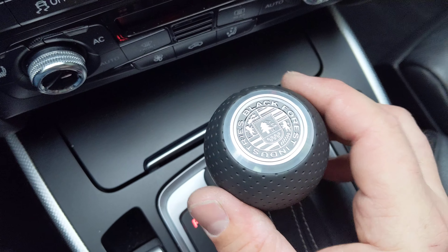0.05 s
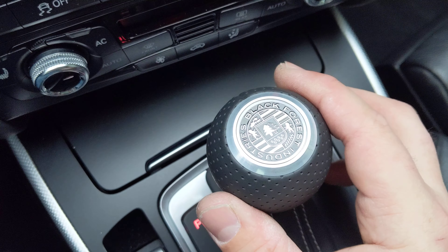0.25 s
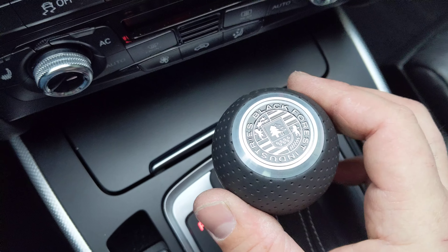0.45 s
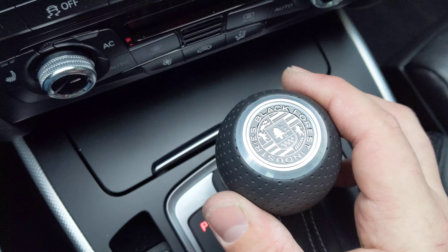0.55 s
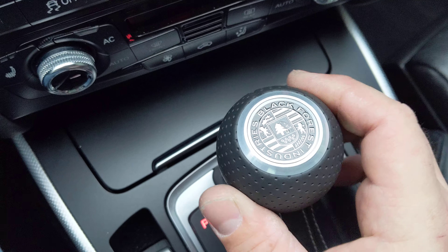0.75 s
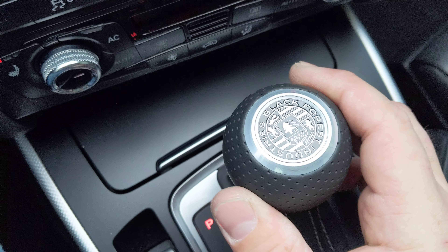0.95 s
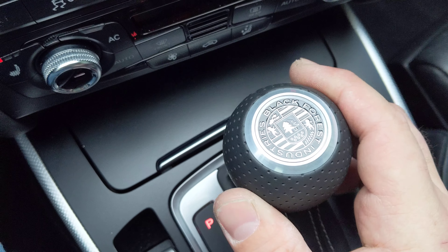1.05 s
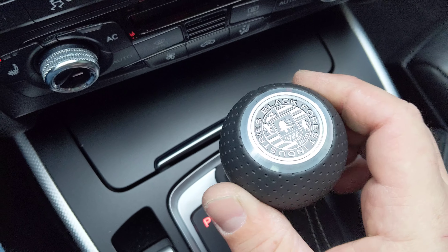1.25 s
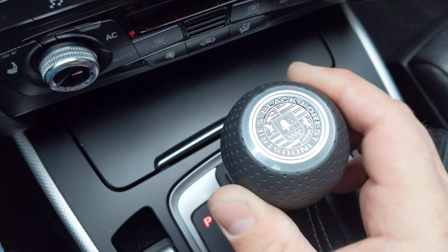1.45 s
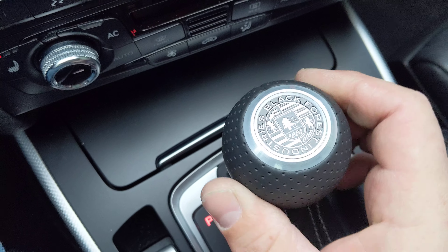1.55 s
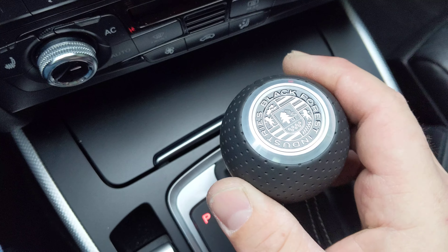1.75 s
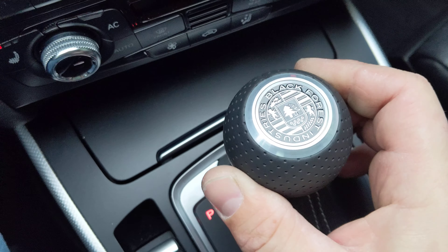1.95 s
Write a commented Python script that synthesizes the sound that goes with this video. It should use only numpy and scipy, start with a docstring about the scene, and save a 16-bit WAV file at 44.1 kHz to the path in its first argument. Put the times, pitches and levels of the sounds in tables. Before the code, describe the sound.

A loose gear knob rattles under a rocking hand, close up in a dry, padded car cabin. Small contacts begin at once, with duller double and triple chatter near 0.5, 0.7, 1.1, 1.45 and 1.8 seconds. Firmer knocks with bright ticks land near 0.9, 1.3, 1.65 and 2.0. Beneath run a steady low idling throb, soft rumble, faint hiss and a barely audible, very high whine.

```python
"""A loose gear lever knob is rocked to and fro by hand in a car with the engine idling.
One way it hits its stop with a knock and a bright tick; on the way back it chatters softly.
Each contact is a set of decaying rings plus bursts of coloured noise, answered briefly by the padded cabin.
Beneath lie the engine's throb (harmonics of the firing rate), rumble and hush (coloured noise)
and a thin electronic whine (a sine)."""
import sys
import numpy as np
from scipy import signal
from scipy.fft import rfft, irfft
from scipy.io import wavfile
from scipy.ndimage import uniform_filter1d

SR = 44100
rng = np.random.default_rng(int(sys.argv[2]) if len(sys.argv) > 2 else 0)


def digitize_waveform(pressure):
    """Quantize a signal to 16-bit integers and store it at the path in sys.argv[1].

    Rows of a 2-D input are taken as channels; values are limited to [-1, 1].
    """
    field = np.atleast_2d(pressure).T
    bounded = np.clip(field, -1, 1)
    quanta = np.round(bounded * 32767).astype(np.int16)
    wavfile.write(sys.argv[1], SR, quanta)


N = 88905  # length in samples

# Colour of the cabin hush. Each row: frequency in Hz, relative level in dB per Hz.
HUSH_COLOUR = [(100, -28), (160, -8.5), (260, -4), (380, -10.5), (500, -12.5), (760, -23.5), (1010, -17.5),
               (1200, -25.5), (1800, -33.5), (4600, -32.5), (7500, -34), (9500, -37), (10600, -41.5),
               (12000, -37), (15000, -54)]
# Colour of the body rumble. Each row: frequency in Hz, relative level in dB per Hz.
RUMBLE_COLOUR = [(8, -13.5), (20, -6.5), (45, 5), (80, -20.5), (125, -5), (170, -26), (300, -50.5)]
# Likeness of the two ears in steady noise. Each row: frequency in Hz, coherence from 0 to 1.
EAR_COHERENCE = [(60, .99), (130, .95), (250, .87), (1000, .65), (2500, .2), (12000, .1)]
# Stereo tilt of steady noise. Each row: frequency in Hz, left minus right in dB.
NOISE_LEFT_DB = [(60, 0), (130, 1), (300, 3), (1000, 4), (4000, -0.5), (13000, -1.5)]
# Whine, shifting between the ears. Each row: time in seconds, left level in dB, right level in dB,
# phase lead of the left in radians.
WHINE_PATH = [(0, -75, -89, 2.5), (.6, -73.5, -101, -1), (.9, -73.5, -97, -13), (1.148, -81, -96, -7),
              (1.598, -78, -88, -3), (1.999, -83, -80, -2.2)]
# Engine harmonics. Each row: multiple of the firing rate, level in dB.
ENGINE_ORDERS = [(1, -41), (2, -55), (3, -60), (4, -68.5), (5, -65.5), (6, -64.5)]
# Echoes from console and windscreen. Each row: delay in seconds, gain as a plain factor.
CABIN_ECHOES = [(.0033, .3), (.0052, 0.58), (.0088, 0.086)]
# Colour of the cabin's tail. Each row: frequency in Hz, level in dB.
CABIN_COLOUR = [(250, -16), (500, -12), (1000, -6), (4000, 0), (9000, 0)]
# Decay of the cabin's tail. Each row: frequency in Hz, time to fall 60 dB in seconds.
CABIN_DECAY = [(200, .1), (500, .07), (1400, .07), (4000, .085), (10000, .07)]
# Contacts of the knob. Each row: time in seconds, relative levels of thud, knock, clack and tick in dB,
# side of its play ("near" or "far").
CONTACTS = [(0.0246, -56.5, -62.5, -63.5, -74, "near"), (0.228, -57, -69, -76, -87, "far"),
            (.2450, -49, -61, -75, -83, "far"), (.4200, -83, -74, -74, -77, "near"),
            (0.4989, -45.5, -52.5, -58, -71, "far"), (0.659, -58, -66, -73, -93, "far"),
            (0.6879, -53, -60.5, -59.5, -72.5, "far"), (0.717, -86, -67, -71, -82, "far"),
            (.8840, -64, -71, -68, -86, "near"), (0.9108, -43.5, -56, -59, -60.5, "near"),
            (1.0887, -49.5, -60, -61.5, -79, "far"), (1.1117, -56.5, -62.5, -63.5, -74, "far"),
            (1.2857, -45.5, -50.5, -57.5, -55, "near"), (1.4352, -53, -52.5, -66.5, -77, "far"),
            (1.4677, -51.5, -60.5, -66, -66.5, "far"), (1.4904, -56.5, -61.5, -66, -71.5, "far"),
            (1.6402, -41, -52.5, -55.5, -57.5, "near"), (1.8211, -51, -54, -62.5, -82, "far"),
            (1.829, -56, -66, -66, -82, "far"), (1.8480, -66, -62, -72, -77.5, "far"),
            (2.0115, -46, -54.5, -49.5, -52.5, "near")]
# Where thud, knock, clack and tick are centred. Each entry: frequency in Hz.
BLOW_HZ = [400, 1100, 4200, 7600]
# Rings of lever and knob. Each row: nominal frequency in Hz, time to fall 60 dB in seconds,
# relative level struck on the near side in dB, relative level struck on the far side in dB.
RING_MODES = [(239.7, 0.11, -5.5, -18), (281.3, 0.061, -5, 2.5), (370.5, 0.024, -17, -3),
              (452.5, 0.056, -1, -9), (483.8, 0.063, -4, -9.5), (689, 0.02, -1, -5),
              (938.7, 0.013, 1.5, -0.5), (1239, 0.0082, 0, -5.5), (2416, 0.0072, -10.5, -9.5),
              (3756, 0.0023, -11, -6), (5590, 0.0089, -1, -3.5), (7490, 0.0037, -1, -10),
              (9420, 0.0022, -2, -6.5), (10940, 0.001, -8.5, -24)]
# Stereo tilt of the knob. Each row: frequency in Hz, right minus left in dB.
KNOB_RIGHT_DB = [(300, 0), (1000, -7.5), (4000, -2), (8000, -0.5), (12000, -3)]

HUSH_DB, RUMBLE_DB = -61, -52.5
WHINE_HZ = 15625
FIRING_HZ, FIRST_FIRING_S = 23.22, 0.0028
IDLE_WANDER = 0.001  # rms unevenness, as a fraction of the firing rate
THROB_LEFT_DB = 0.7
EVEN_HZ = 150  # the cabin tail's spectrum is evened over bands this wide
TAIL_RISE_S = 0.0012
KNOB_DB = -13
BEFORE_S = 0.02  # room for the scuff ahead of each contact
RIGHT_LAG_S = 0.0001  # the right ear hears the contact later
METAL_HZ = 2000  # modes above this ring when the metal seat is reached
NEAR_LEAD_S, FAR_LEAD_S = 0.0028, 0.001  # the lever is pressed this long before the seat clicks
THUD_LAG_CYCLES, THUD_TOP_HZ = 0.6, 600  # the low ring reaches the console late
SEAT_RISE_S, RISE_CYCLES = 0.0004, 1  # the two parts of each ring's rise time
DETUNE, SCATTER_DB = 0.015, 0.4  # random spread of pitch (fraction) and level of each ring
CRACK_DB, CRACK_T60_S, CRACK_TOP_HZ = 1, 0.0085, 10300
SCUFF_DB, SCUFF_S, SCUFF_TOP_HZ = 3.5, 0.003, 3830
EDGE_HZ = 16000


def amp(db):
    """Decibels to gain."""
    return 10 ** (np.asarray(db) / 20)


def evened(x):
    """Scales to rms 1."""
    return x / np.sqrt(np.mean(x ** 2) + 1e-20)


def read(points, hz):
    """Reads a table on a log-frequency axis."""
    f, value = np.transpose(points)
    return np.interp(np.log(hz + 1), np.log(f + 1), value)


def decay(t, t60):
    """Exponential decay that falls 60 dB in t60 seconds."""
    return np.exp(-np.log(1000) * t / t60)


def add(mix, s, sound):
    """Mixes a stereo sound in at a time in seconds."""
    part = mix[:, max(round(s * SR), 0):][:, :sound.shape[1]]
    part += sound[:, :part.shape[1]]


def noise(colour):
    """Steady stereo noise of a given colour at rms 1: random phases, near mono in the bass."""
    hz = np.fft.rfftfreq(N, 1 / SR)
    shared, other = np.exp(2j * np.pi * rng.random((2, len(hz))))
    same = np.clip(read(EAR_COHERENCE, hz), -1, 1)
    tilt = amp(read(NOISE_LEFT_DB, hz) / 2)
    left = shared * tilt
    right = (same * shared + np.sqrt(1 - same ** 2) * other) / tilt
    return evened(irfft(np.array([left, right]) * amp(read(colour, hz)), N))


def hush():
    """Faint, steady hiss of the cabin as coloured noise."""
    return amp(HUSH_DB) * noise(HUSH_COLOUR)


def whine():
    """A thin, very high electronic tone: one sine whose level and phase shift between the ears."""
    t = np.arange(N) / SR
    s, *columns = np.transpose(WHINE_PATH)
    left_db, right_db, lead = (np.interp(t, s, column) for column in columns)
    phase = 2 * np.pi * WHINE_HZ * t + np.array([lead, -lead]) / 2
    return amp([left_db, right_db]) * np.sqrt(2) * np.sin(phase)


def engine():
    """Idle throb: one soft dip of pressure per firing, slightly uneven, over body rumble."""
    t = np.arange(N) / SR
    wander_hz = np.geomspace(1, 8, 10)
    wander = evened(sum(np.sin(2 * np.pi * (f * t + rng.random())) for f in wander_hz))
    firings = np.cumsum(FIRING_HZ * (1 + IDLE_WANDER * wander)) / SR - FIRST_FIRING_S * FIRING_HZ
    throb = np.zeros(N)
    for order, db in ENGINE_ORDERS:
        # all orders reach their trough together at each firing
        throb -= amp(db) * np.sqrt(2) * np.cos(2 * np.pi * round(order) * firings)
    return throb * amp([[THROB_LEFT_DB], [0]]) + amp(RUMBLE_DB) * noise(RUMBLE_COLOUR)


def cabin(x):
    """Padded cabin: a few close echoes and a short diffuse tail, different for each ear."""
    size = x.shape[1]
    hz, t, bands = signal.stft(rng.standard_normal((2, size)), SR, nperseg=128)
    bands = bands * decay(t, read(CABIN_DECAY, hz)[:, None])
    tail = rfft(signal.istft(bands, SR, nperseg=128)[1][:, :size], 2 * size)
    tail = tail / np.sqrt(uniform_filter1d(abs(tail) ** 2, round(2 * size * EVEN_HZ / SR)))
    colour = amp(read(CABIN_COLOUR, np.fft.rfftfreq(2 * size, 1 / SR)))
    response = irfft(tail * colour)[:, :size]
    response *= np.minimum(np.arange(size) / SR / TAIL_RISE_S, 1)
    response[:, 0] += 1  # direct sound
    for delay, gain in CABIN_ECHOES:
        response[:, round(delay * SR)] += gain
    return signal.fftconvolve(x, response, axes=1)


def grit(blow, top_hz, size):
    """Rough-surface noise in the colour of a blow, above the knock and rolled off past a limit."""
    hz = np.fft.rfftfreq(size, 1 / SR)
    colour = amp(read(blow, hz)) * (hz > BLOW_HZ[1]) / (1 + (hz / top_hz) ** 4)
    phases = np.exp(2j * np.pi * rng.random((2, len(hz))))
    return irfft(colour * phases, size) * np.sqrt(size)


def rings(t, blow, side):
    """The struck lever and knob ring as decaying sines, the low ones led by the press of the lever."""
    out = np.zeros(t.shape)
    lead = NEAR_LEAD_S if side == "near" else FAR_LEAD_S
    for hz, t60, near_db, far_db in RING_MODES:
        detune, scatter = rng.standard_normal(2)
        start = THUD_LAG_CYCLES / hz * (hz < THUD_TOP_HZ) - lead * (hz < METAL_HZ)
        age = np.maximum(t - start, 0)
        rise = 1 - np.exp(-age / (SEAT_RISE_S + RISE_CYCLES / hz))
        tone = np.sin(2 * np.pi * hz * (1 + DETUNE * detune) * age)
        mode_db = near_db if side == "near" else far_db
        level_db = read(blow, hz) + mode_db + SCATTER_DB * scatter
        out += amp(level_db) * evened(rise * decay(age, t60) * tone)
    return out


def contact(levels_db, side):
    """The sleeve scuffs and the lever takes the blow; the knob's seat cracks and ticks a moment later."""
    t = np.arange(SR // 4) / SR - BEFORE_S - np.array([[0], [RIGHT_LAG_S]])
    size = t.shape[1]
    blow = list(zip(BLOW_HZ, levels_db))
    crack = evened((t > 0) * decay(abs(t), CRACK_T60_S))
    scuff = evened(np.exp(-abs(t) / SCUFF_S))  # swells before the contact and fades after it
    out = amp(CRACK_DB) * crack * grit(blow, CRACK_TOP_HZ, size)
    out += amp(SCUFF_DB) * scuff * grit(blow, SCUFF_TOP_HZ, size)
    return out + rings(t, blow, side)


def knob():
    """All contacts of the loose knob in the cabin's echo, set a little to the left by a treble tilt."""
    out = np.zeros((2, 2 * N))
    for s, *levels_db, side in CONTACTS:
        add(out, s - BEFORE_S, cabin(contact(levels_db, side)))
    tilt = amp(read(KNOB_RIGHT_DB, np.fft.rfftfreq(2 * N, 1 / SR)))
    out[1] = irfft(rfft(out[1]) * tilt)
    return amp(KNOB_DB) * out[:, :N]


def scene():
    """Hush, whine and engine beneath the knob."""
    return hush() + whine() + engine() + knob()


def record(dry):
    """Steep low-pass that closes off the extreme treble."""
    low_pass = signal.firwin(511, EDGE_HZ, window=("kaiser", 9), fs=SR)
    return signal.oaconvolve(dry, low_pass[None], "same")


dry = scene()
out = record(dry)
digitize_waveform(out)
```